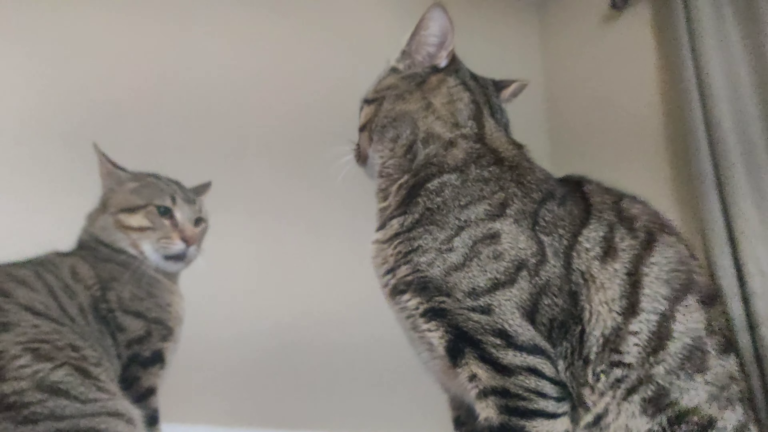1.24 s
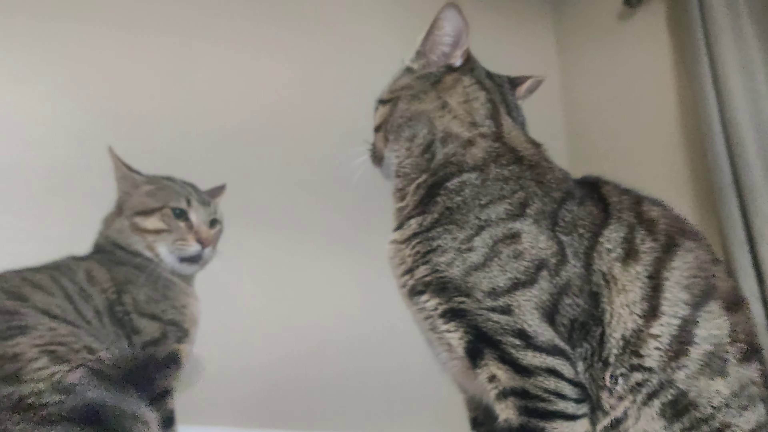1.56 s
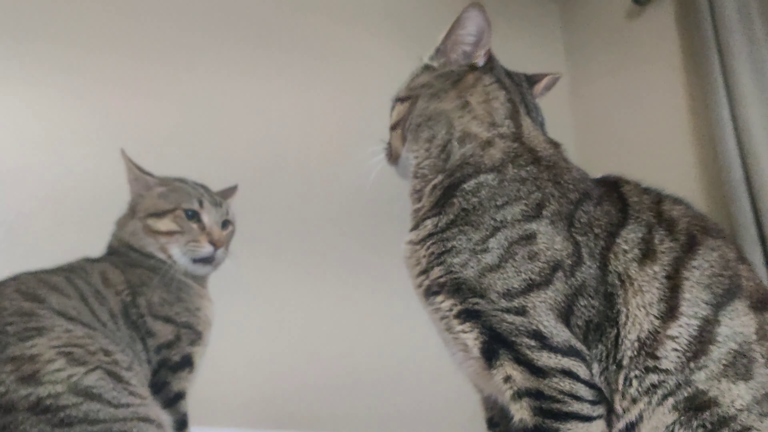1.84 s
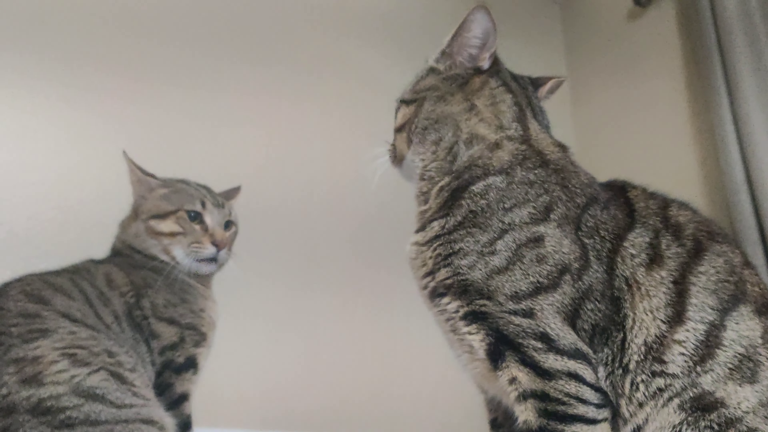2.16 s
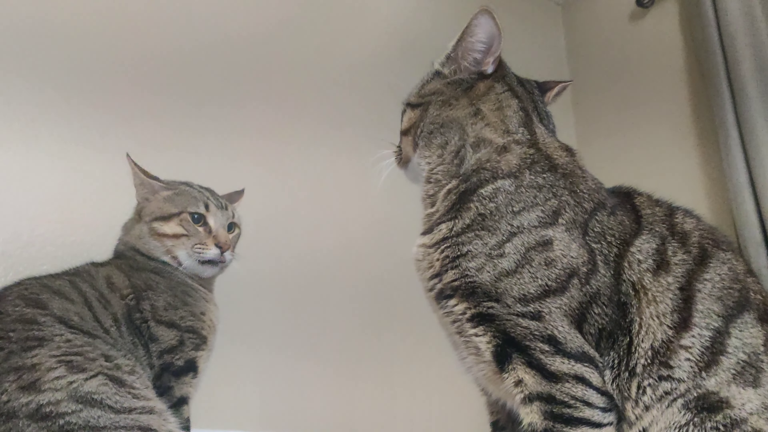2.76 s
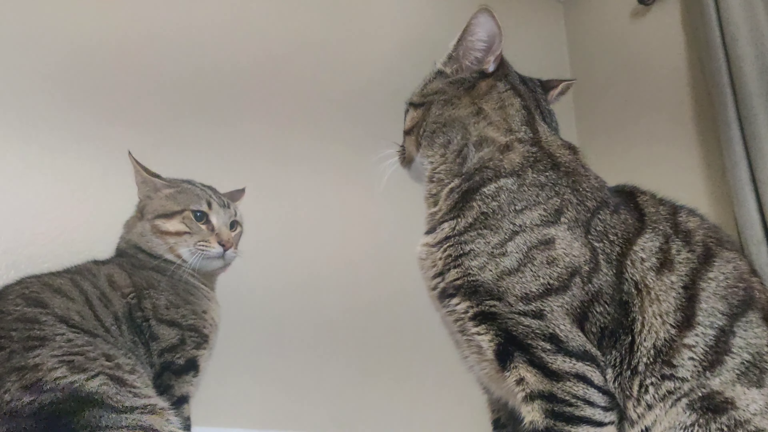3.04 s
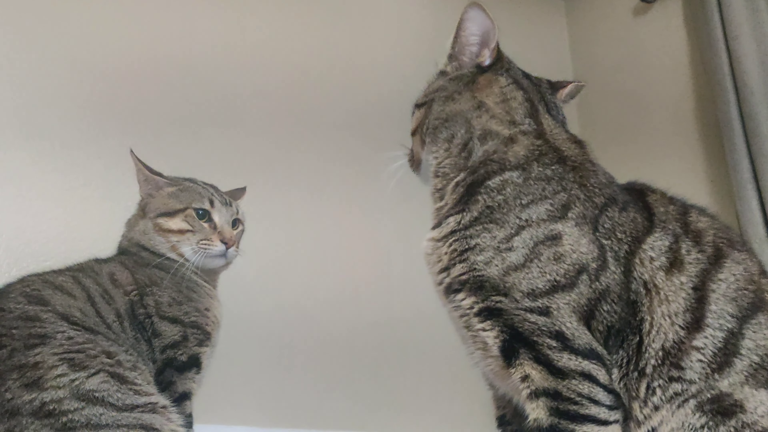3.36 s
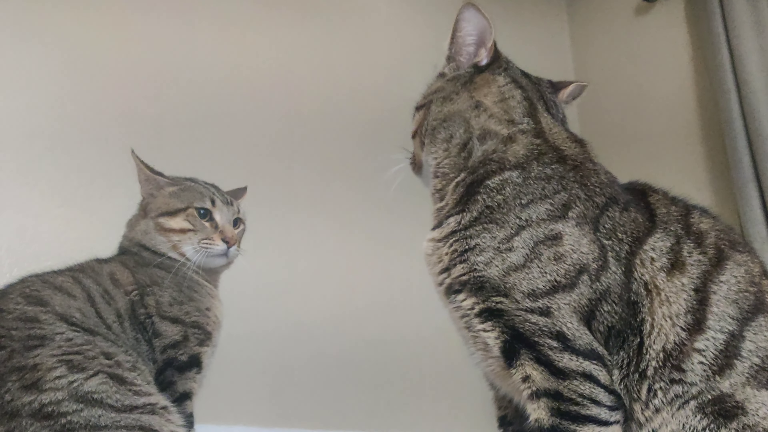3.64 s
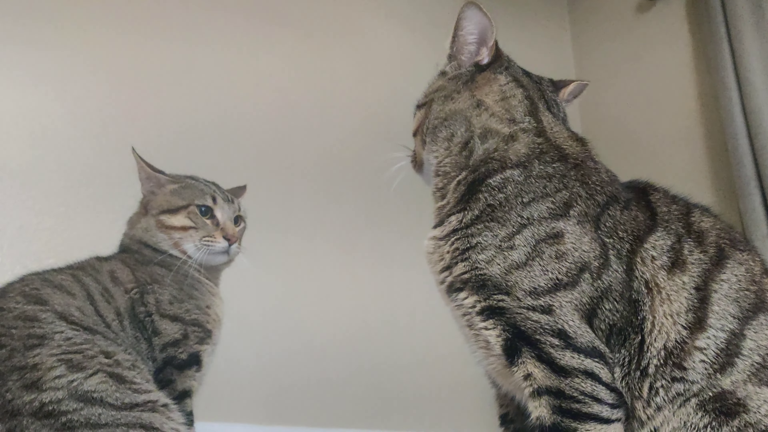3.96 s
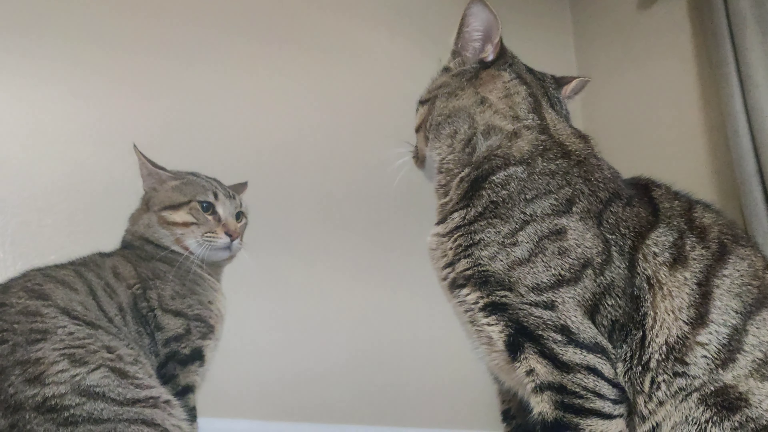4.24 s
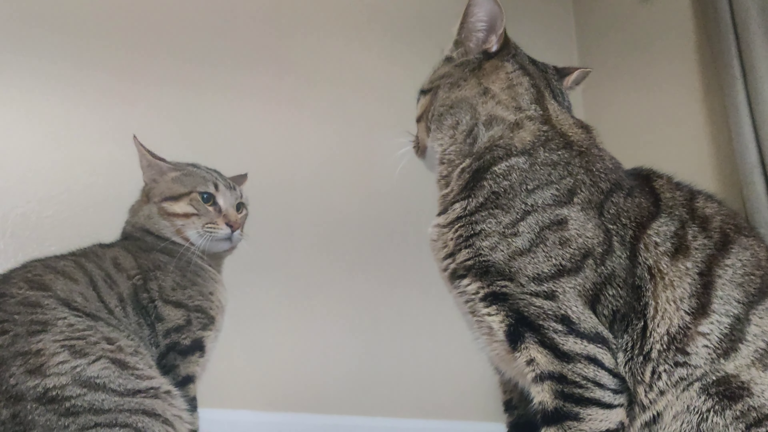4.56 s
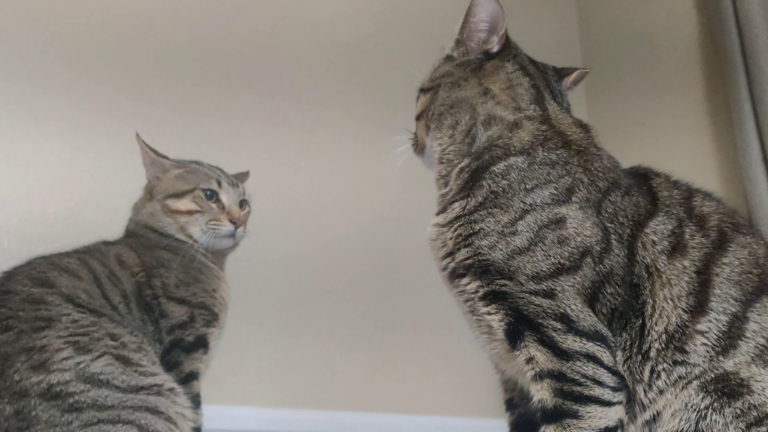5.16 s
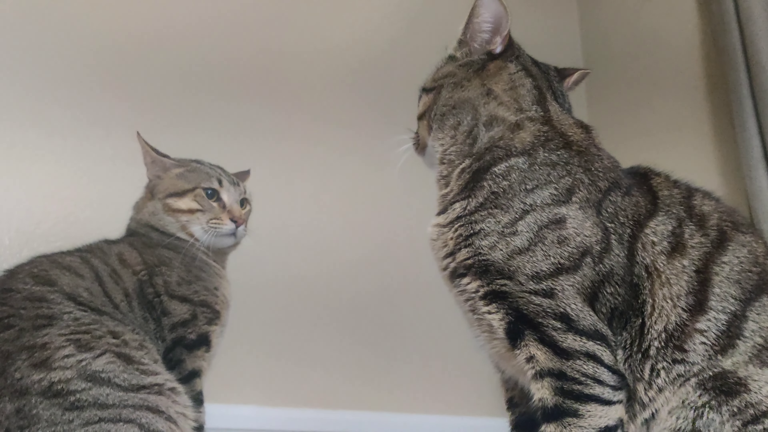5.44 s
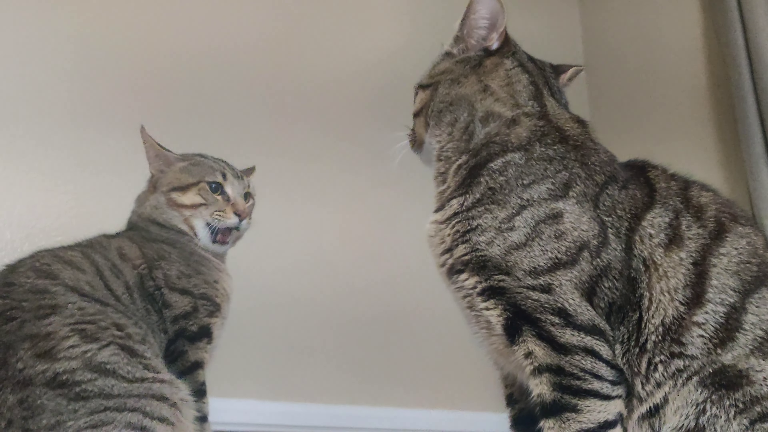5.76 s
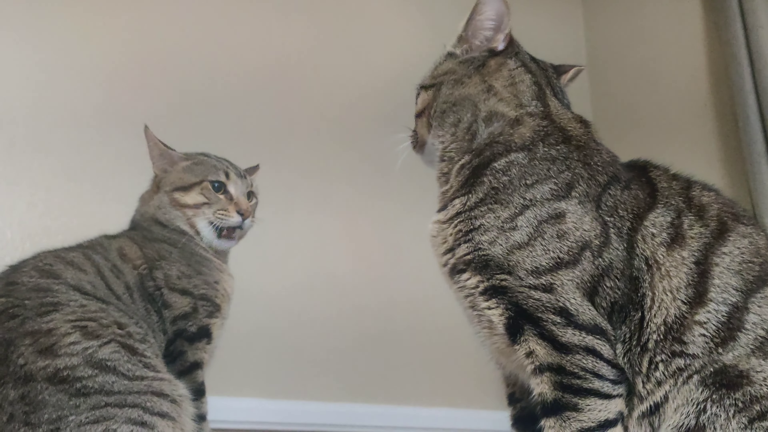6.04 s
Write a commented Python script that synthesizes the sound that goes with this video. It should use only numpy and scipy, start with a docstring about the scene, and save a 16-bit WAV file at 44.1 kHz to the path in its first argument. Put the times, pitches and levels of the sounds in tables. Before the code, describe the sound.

Two cats yowl at each other in a small room: a long wavering yowl, a short answering cry, then a falling wail.

```python
"""Two cats face off

In a small bare room, a step from a hand-held camera, the left cat holds a long yowl, the right one
answers with a moan that opens into a short cry, and the left one wails again. Their vocal folds make
gliding harmonics that brighten as the jaw drops. The walls return each harmonic, so that it beats
with itself; a few soft bumps sound over room rumble and hiss."""
import sys
import numpy as np
from scipy import signal
from scipy.fft import rfft, irfft
from scipy.io import wavfile

SR = 44100
rng = np.random.default_rng(int(sys.argv[2]) if len(sys.argv) > 2 else 0)


def generate_wav(sig):
    """Save sig (samples, or channels by samples) to the path in sys.argv[1] as 16-bit PCM at SR."""
    pcm = np.round(np.clip(np.atleast_2d(sig).T, -1, 1) * 32767).astype(np.int16)
    wavfile.write(sys.argv[1], SR, pcm)


N = 322371
TIME = np.arange(N) / SR
FREQS = np.maximum(np.fft.rfftfreq(N, 1 / SR), 1)

# long yowl, moan, cry and wail, with their dry levels at MIDDLE_HZ:
# start/s, stop/s, attack/s, mouth level/dB, fundamental level/dB, resting jaw opening/0-1
CALLS = [(-.3, 2.3, .05, -20.3, -40.7, .31), (4.1, 4.3, .1, -40, -42, .3),
         (4.27, 4.815, .1, -27, -42.5, .35), (5.655, 7.7, .065, -21.8, -43, .21)]
# pitch lines of the long yowl, the moan with its cry, and the wail: t/s, f/Hz
YOWL_GLIDE = [(0.02, 503.4), (0.09, 507.4), (0.21, 538.3), (0.33, 546.0), (0.48, 550.1), (0.61, 542.1),
              (0.77, 541.9), (0.91, 551.0), (1.05, 544.0), (1.19, 547.9), (1.44, 566.0), (1.64, 558.1),
              (2.15, 524.4), (2.23, 498.9), (2.28, 495.1)]
ANSWER_GLIDE = [(4.12, 540.9), (4.13, 511.9), (4.162, 482.9), (4.24, 517.6), (4.272, 563.6), (4.29, 631.5),
                (4.328, 571.6), (4.432, 604.6), (4.748, 578.5), (4.77, 569.3)]
WAIL_GLIDE = [(5.7, 407), (5.726, 483), (5.81, 578), (5.878, 621), (5.944, 642), (6.278, 614), (6.38, 575),
              (6.47, 572), (7.054, 501), (7.3, 510)]
# tone colour of each cat's throat and mouth: f/Hz, weight with jaw shut/dB, weight with jaw wide/dB
LEFT_FORMANTS = [(980, 17, -29.5), (1315, 5, -10), (1682, -8.5, 13.5), (1940, -34.5, -9), (2230, -11, 8.5),
                 (2630, -63, -7), (3100, -52, -20.5), (3900, -75, -15), (4600, -29, -26),
                 (5450, -29.5, -27), (6400, -57, -69)]
RIGHT_FORMANTS = [(1150, 2, -5), (1740, -9, 7.5), (2420, -24, 0), (3000, -37, -19), (4100, -39, -32),
                  (4700, -48, -2), (5400, -36, -11), (6500, -38, -30)]
# the jaw drops and closes again: t/s, opening/s, hold/s, closing/s, extra opening/0-1
JAW_DROPS = [(1.2, .2, .38, .5, .15), (4.3, .26, .09, .17, .68), (5.72, .13, .42, .15, .6),
             (5.78, .1, .12, .16, .19), (7.14, .16, .2, .2, .19)]
# brief pushes of effort: t/s, half-length/s, boost/dB
ACCENTS = [(1.47, .07, 3), (4.388, .022, 6.5), (4.56, .06, 3), (6.0, .12, 2)]
# the wail breaks into a rasp just before the jaw closes: t/s, half-length/s, extra roughness/0-1
WAIL_RASP = (6.26, .1, .48)
# soft bumps: t/s, level/dB, f/Hz, t60/s, tick against thud/dB
THUDS = [(1.321, -29, 160, 0.062, -3), (1.831, -31.5, 175, 0.14, -3), (1.866, -34, 75, .12, -10),
         (2.102, -31, 306, 0.12, 2.5), (2.889, -36.5, 125, 0.17, -20)]
# spectrum of the room tone: f/Hz, relative level/dB
TONE_SHAPE = [(13, -30), (22, 2.5), (43, 1.5), (92, -6), (138, -3.5), (172, -11.5), (253, -3), (333, -10.5),
              (475, -15), (1020, -15), (2270, -13), (5170, -11.5), (8480, -24.5), (12100, -21.5),
              (15500, -26.5)]
# its resonances: f/Hz, width/Hz, boost/dB
TONE_RESONANCES = [(120, 12, 1.5), (149.8, 8.2, 8.5), (252, 30, 0), (492.4, 94, 9.5), (2294, 8.8, 13)]
# its stereo image: f/Hz, left-right likeness/0-1
TONE_COHERENCE = [(130, 0.88), (290, 0.82), (640, .36), (1400, .05), (15000, .02)]
# its balance: f/Hz, left minus right/dB
TONE_PAN = [(100, 1), (700, 0.3), (2400, -1.2), (4400, -3), (8100, 3.5), (15000, 4)]

# across/m, along/m, up/m
ROOM_SIZE, CAMERA = (3.183, 3.991, 2.46), (1.79, 2.71, 0.509)
LEFT_CAT, RIGHT_CAT = (1.571, 3.207, 0.421), (2.334, 3.118, 0.711)
MIC_OFFSET_M, SOUND_M_S = .07, 343
ROOM_T60_S, TAIL_DB = .52, -16.5
MIDDLE_HZ, LOW_VOICE_HZ, LOUDER_DB_PER_OCTAVE = 550, 485, 6
RELEASE_S, EDGE_DB = .07, -16  # the mouth sound swells from and sinks to this far down
STEADY_ROUGH, EDGE_ROUGH, SETTLE_S = .09, .18, .25
TREMBLE, EDGE_TREMBLE = .0045, .003  # shares of the pitch


def yowl(call, glide, formants, fundamental_db_per_octave, jitter=0.027, shimmer=0.21,
         air_db=-29, air_hz=4600, full_voice_db=-27, fade_s=0.022):
    """Vocal folds give harmonics; the opening jaw shifts weight from the 2nd to the 3rd and 4th."""
    start_s, stop_s, _, _, fundamental_db, _ = call
    hz = np.interp(TIME, *np.transpose(glide))
    jaw, mouth_db, rough, tremble = effort(call, hz)
    fundamental_db += fundamental_db_per_octave * np.log2(np.maximum(hz, LOW_VOICE_HZ) / MIDDLE_HZ)
    # tense muscles make the pitch quiver; under strain the cycles turn uneven in length and strength
    hz = hz * (1 + tremble * band_noise(12, 28) + jitter * rough * band_noise(40, 116))
    pressure = 1 + shimmer * rough * band_noise(30, 120)
    phase = 2 * np.pi * np.cumsum(hz) / SR
    # a weak voice closes the folds gently and loses its upper harmonics
    rolloff_db_per_octave = np.clip(full_voice_db - mouth_db, 0, 12)
    overtones, power = 0, 0
    for k in range(2, 12):
        shut_db, wide_db = along(formants, k * hz)
        formant_db = shut_db + np.clip(jaw, 0, 1) * (wide_db - shut_db)
        gain = undb(formant_db - rolloff_db_per_octave * np.log2(k / 2))
        overtones += gain * np.sin(k * phase)
        power += gain ** 2
    # air hisses through the teeth when the cat pushes hardest
    air = undb(air_db + 2 * (mouth_db - mouth_db.max())) * band_noise(0.85 * air_hz, 1.16 * air_hz)
    mouth = undb(mouth_db) * (overtones / np.sqrt(power) + air)
    # the fundamental leaves through nose and chest, whatever the jaw does
    fundamental = undb(fundamental_db) * np.sin(phase)
    return np.sqrt(2) * (mouth + fundamental) * pressure * ramps(start_s, fade_s, stop_s, fade_s)


def effort(call, hz):
    """The performance of one call: jaw opening, mouth level, roughness and tremble."""
    start_s, stop_s, attack_s, level_db, _, resting_jaw = call
    gape = sum(size * ramps(s, opening, s + opening + hold + closing, closing)
               for s, opening, hold, closing, size in JAW_DROPS)
    envelope_db = EDGE_DB * (1 - ramps(start_s, attack_s, stop_s, RELEASE_S))
    accent_db = sum(boost_db * hump(s, half_s) for s, half_s, boost_db in ACCENTS)
    mouth_db = level_db + envelope_db + accent_db + LOUDER_DB_PER_OCTAVE * np.log2(hz / MIDDLE_HZ)
    # the folds run smoothly in mid-call and unevenly while they start and stop
    from_edge_s = np.maximum(np.minimum(TIME - start_s, stop_s - TIME), 0)
    unsettled = np.exp(-from_edge_s / SETTLE_S)
    rasp_s, rasp_half_s, rasp_rough = WAIL_RASP
    rough = STEADY_ROUGH + EDGE_ROUGH * unsettled + rasp_rough * hump(rasp_s, rasp_half_s)
    return resting_jaw + gape, mouth_db, rough, TREMBLE + EDGE_TREMBLE * unsettled


def room(voice, place, facing_db, pan_db, gain_db, wall_gain=0.86, tail_start_s=.07, max_bounces=11):
    """A cat reaches both mics directly, by its mirror images in the walls, then as a diffuse tail."""
    cells = np.indices((15, 15, 15)).reshape(3, -1).T - 7
    cells = cells[np.abs(cells).sum(axis=1) <= max_bounces]
    bounces = np.abs(cells).sum(axis=1)
    images = cells * ROOM_SIZE + np.where(cells % 2, np.subtract(ROOM_SIZE, place), place)
    # the more a cat faces the camera, the weaker its voice is toward the walls
    strength = wall_gain ** bounces * np.where(bounces, undb(-facing_db), 1)
    t = TIME[:SR]
    tail_envelope = np.clip(t / tail_start_s - .5, 0, 1) * decay(t, ROOM_T60_S)
    channels = []
    for side in (-1, 1):
        distance = np.linalg.norm(images - CAMERA - [side * MIC_OFFSET_M, 0, 0], axis=1)
        delay_samples = np.rint(distance / SOUND_M_S * SR).astype(int)
        early = np.bincount(delay_samples, strength / distance, SR)
        tail = rng.standard_normal(SR) * tail_envelope
        response = early / np.linalg.norm(early) + undb(TAIL_DB) * tail / np.linalg.norm(tail)
        channels.append(undb(gain_db - side * pan_db / 2) * signal.fftconvolve(voice, response)[:N])
    return np.array(channels)


def bumps(tick_t60_s=.025):
    """Each bump is a dull, quickly damped thud with a small tick at contact."""
    out = np.zeros(N)
    for s, db, hz, t60, tick_db in THUDS:
        age = np.maximum(TIME - s, 0)
        thud = (np.sin(2 * np.pi * hz * age) + 0.56 * band_noise(0.8 * hz, 2 * hz)) * decay(age, t60)
        tick = band_noise(505, 5000) * decay(age, tick_t60_s)
        out += undb(db) * (TIME >= s) * (thud + undb(tick_db) * tick)
    return out


def room_tone(mid_db=-39):
    """A steady bed: rumble, alike at both mics, under wide hiss that differs between them."""
    db, = along(TONE_SHAPE, FREQS)
    likeness, = along(TONE_COHERENCE, FREQS)
    pan_db, = along(TONE_PAN, FREQS)
    db += sum(boost / (1 + (2 * (FREQS - hz) / width) ** 2) for hz, width, boost in TONE_RESONANCES)
    mid, side = rfft(rng.standard_normal((2, N))) * undb(db)
    spread = np.sqrt((1 - likeness) / (1 + likeness))
    polarity = np.array([[1], [-1]])
    stereo = (mid + polarity * side * spread) * undb(polarity * pan_db / 2)
    return undb(mid_db) * irfft(stereo, N) / np.std(irfft(mid, N))


def undb(db):
    """Decibels to gain."""
    return 10 ** (np.asarray(db) / 20)


def along(rows, hz):
    """The columns of a frequency table, read at hz."""
    points, *columns = np.transpose(rows)
    return [np.interp(np.log(hz), np.log(points), column) for column in columns]


def band_noise(lo_hz, hi_hz):
    """Noise of rms 1 between two frequencies."""
    sos = signal.butter(2, [lo_hz, hi_hz], "band", fs=SR, output="sos")
    noise = signal.sosfilt(sos, rng.standard_normal(N))
    return noise / np.sqrt(np.mean(noise ** 2))


def decay(age_s, t60_s):
    """A fall of 60 dB every t60_s."""
    return np.exp(-np.log(1000) * age_s / t60_s)


def hump(s, half_s):
    """A smooth swell to 1 and back around one moment."""
    return np.exp(-((TIME - s) / half_s) ** 2)


def ramps(start_s, attack_s, stop_s, release_s):
    """Attack, hold at 1, release."""
    return np.clip(np.minimum((TIME - start_s) / attack_s, (stop_s - TIME) / release_s), 0, 1)


def scene():
    """The mix: two cats up front, bumps and room tone behind them."""
    long_yowl, moan, cry, wail = CALLS
    left_voice = sum(yowl(call, glide, LEFT_FORMANTS, fundamental_db_per_octave=22)
                     for call, glide in [(long_yowl, YOWL_GLIDE), (wail, WAIL_GLIDE)])
    right_voice = sum(yowl(call, ANSWER_GLIDE, RIGHT_FORMANTS, fundamental_db_per_octave=-26)
                      for call in (moan, cry))
    left_cat = room(left_voice, LEFT_CAT, facing_db=3.5, pan_db=-2.0, gain_db=1.16)
    right_cat = room(right_voice, RIGHT_CAT, facing_db=1.5, pan_db=-0.5, gain_db=3.25)
    return left_cat + right_cat + bumps() + room_tone()


def record(dry):
    """The camera cuts the top end steeply above 15550 Hz."""
    return signal.sosfilt(signal.ellip(10, .2, 80, 15550, fs=SR, output="sos"), dry)


dry = scene()
out = record(dry)
generate_wav(out)
```